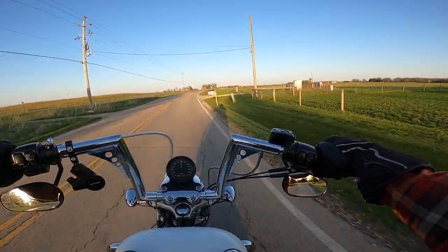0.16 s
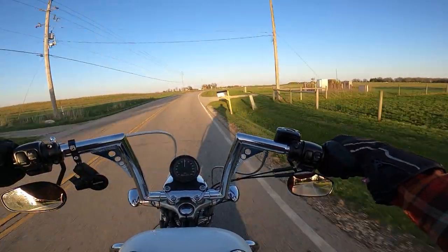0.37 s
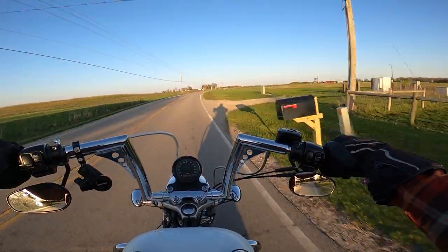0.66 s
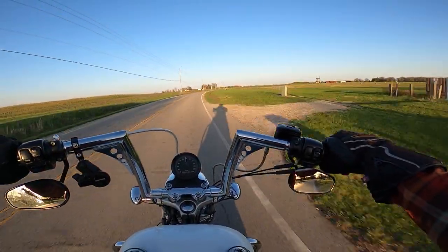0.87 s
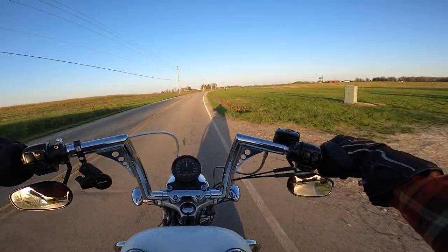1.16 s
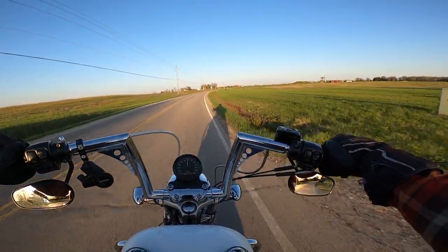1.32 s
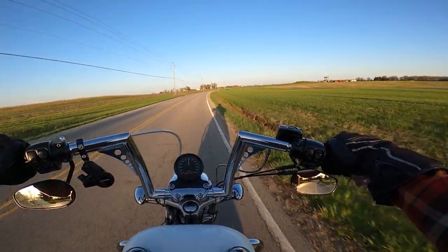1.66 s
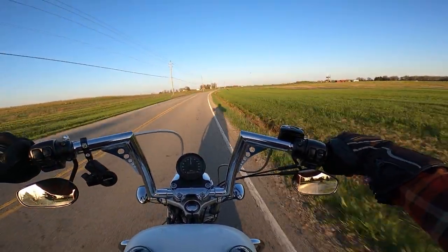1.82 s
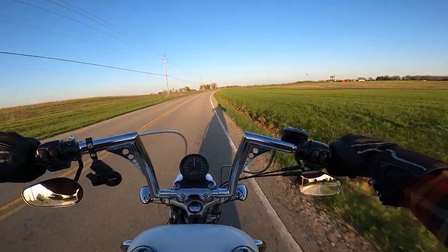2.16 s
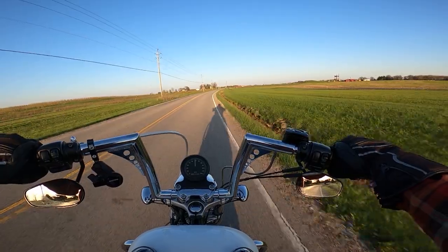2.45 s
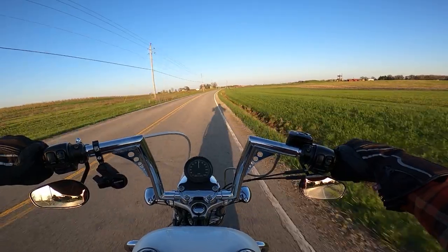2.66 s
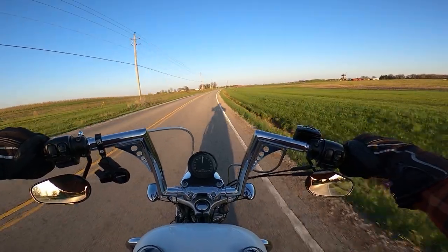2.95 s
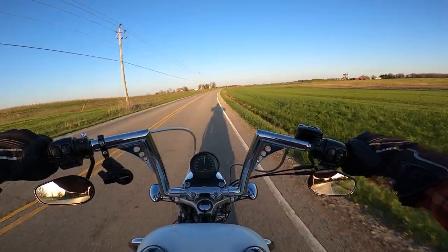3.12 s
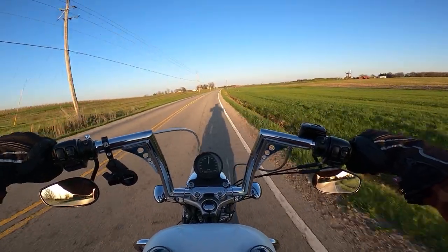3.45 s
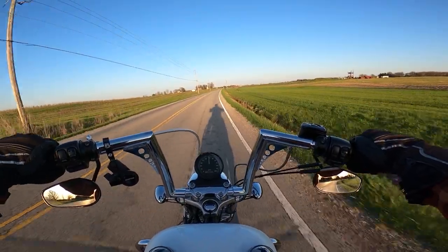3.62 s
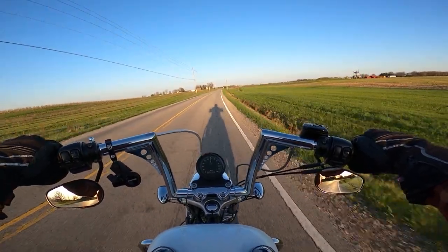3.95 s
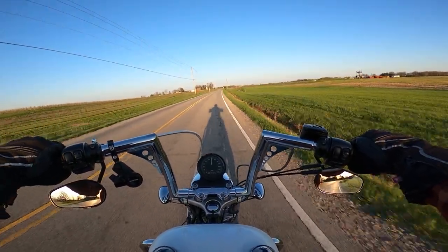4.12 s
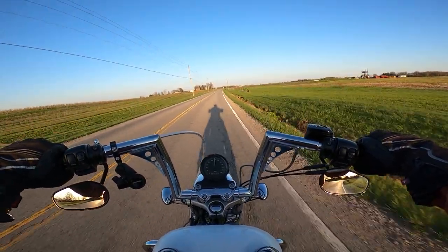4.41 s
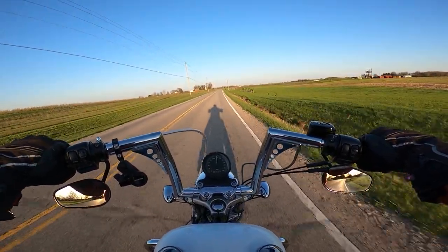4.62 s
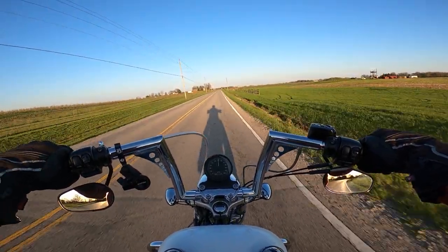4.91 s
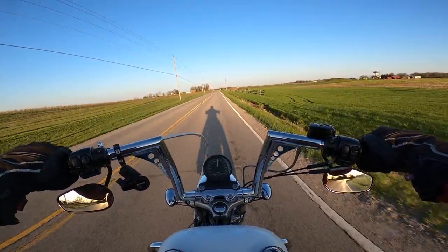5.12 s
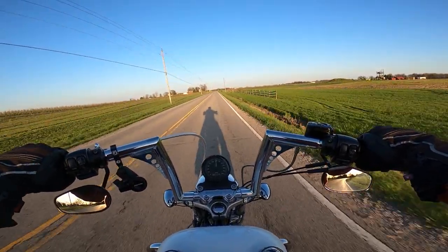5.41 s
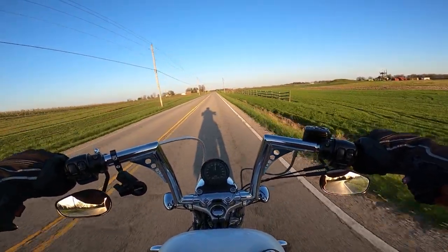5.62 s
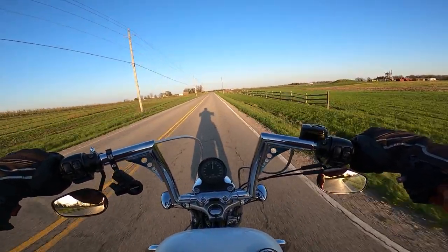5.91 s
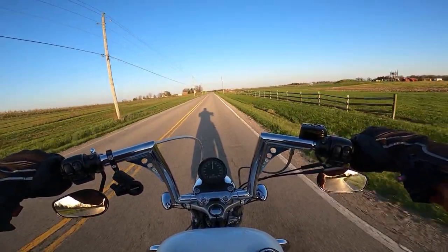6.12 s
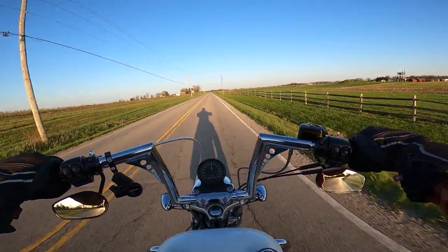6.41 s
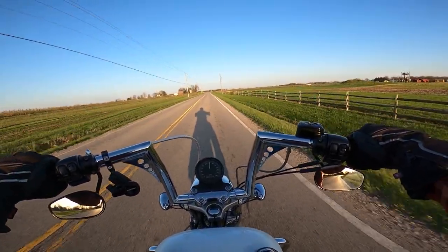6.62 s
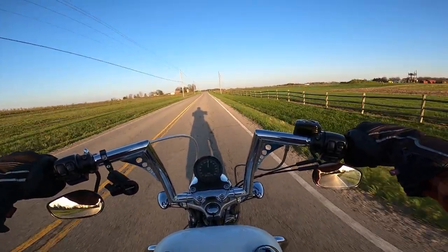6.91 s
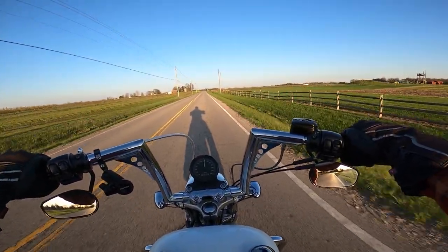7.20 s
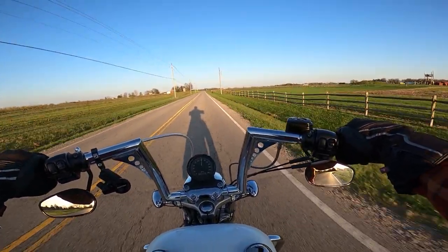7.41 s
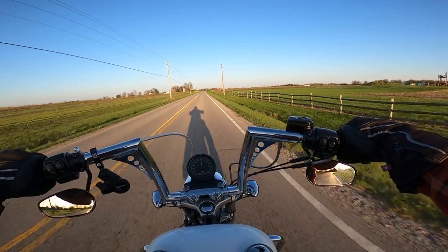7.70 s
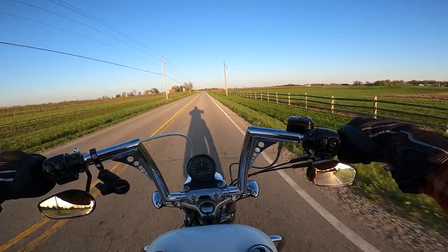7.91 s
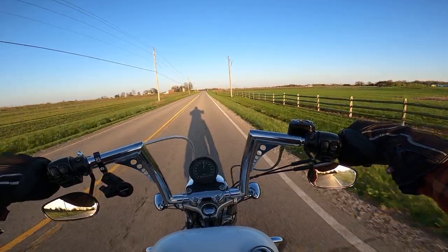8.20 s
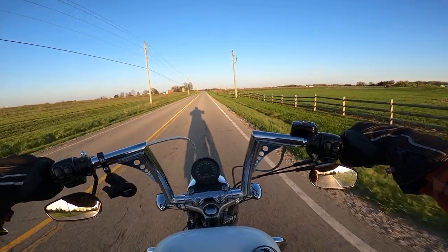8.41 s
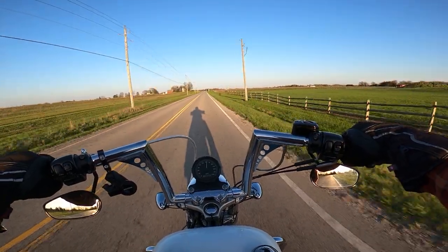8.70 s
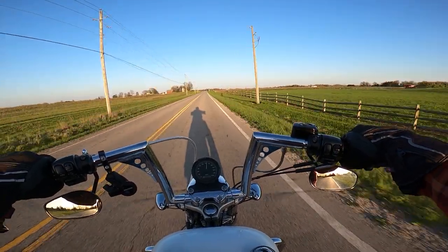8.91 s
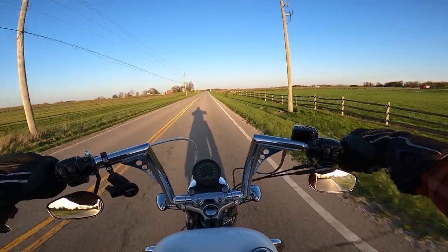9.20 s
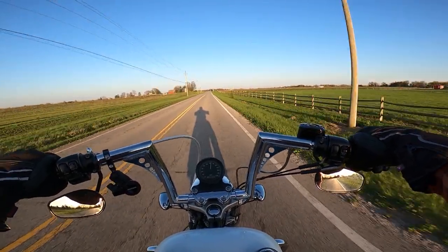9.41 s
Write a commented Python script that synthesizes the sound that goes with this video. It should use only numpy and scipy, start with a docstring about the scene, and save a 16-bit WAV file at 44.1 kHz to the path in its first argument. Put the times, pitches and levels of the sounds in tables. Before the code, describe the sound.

A continuous low motorcycle drone, about twenty-four lumpy engine cycles a second, fills the foreground from start to end. Metallic engine knocks and gritty gas and chain rasp repeat within it. The engine settles, pulls gently for several seconds, then holds. Bassy wind rumbles irregularly against the onboard microphone, and tyre wash stays behind. Tiny airy swishes pass early and near the end. Open road, dry and close, with little treble.

```python
"""On a country road, heard from the seat: an air-cooled V-twin motorcycle cruises, slowly gaining speed.
Two unevenly spaced firings boom through their pipes; knocks of valve gear and pistons ring cases and fins.
One speed curve sets the firing rate, the load and which resonances speak; gas and chain rasp every cycle.
Filtered noise makes the wind, which buffets in slow swells, the wash of the road and brief swishes.
A very faint ticking runs at its own rate, and a soft limiter holds the peaks."""
import sys
import numpy as np
from scipy import signal
from scipy.fft import rfft, irfft
from scipy.io import wavfile
from scipy.ndimage import uniform_filter1d, minimum_filter1d

SR = 44100
rng = np.random.default_rng(int(sys.argv[2]) if len(sys.argv) > 2 else 0)


def bounce(signal):
    """Save signal as a 16-bit WAV file at the path given by the first command-line argument."""
    frames = np.transpose(np.atleast_2d(signal))
    limited = np.clip(frames, -1, 1)
    pcm = np.round(limited * 32767).astype(np.int16)
    wavfile.write(sys.argv[1], SR, pcm)


N = 421155
T = np.arange(N) / SR
CYCLE_DEG = 720  # four-stroke: two turns of the crank


def amp(db):
    """Decibels to gain."""
    return 10 ** (np.asarray(db) / 20)


def unit(x):
    """Scales to rms 1."""
    return x / np.sqrt(np.mean(x ** 2) + 1e-20)


def curve(rows):
    """Joins (t/s, value) rows by straight lines."""
    return np.interp(T, *np.transpose(rows))


def colour(x, points):
    """Minimum-phase filter through (f/Hz, level/dB) points: it rings after a blow, never before."""
    size = 16384
    hz, db = np.transpose(points)
    bins_hz = np.fft.rfftfreq(size, 1 / SR)
    log_gain = np.log(amp(np.interp(np.log(bins_hz + 1), np.log(hz + 1), db)))
    # folding the cepstrum onto positive time makes the response causal
    cepstrum = irfft(log_gain)
    cepstrum[1:size // 2] *= 2
    cepstrum[size // 2 + 1:] = 0
    response = irfft(np.exp(rfft(cepstrum)))[:size // 2]
    return signal.oaconvolve(x, response)[:N]


def noise(points):
    """Noise of rms 1 with the given spectrum."""
    return unit(colour(rng.standard_normal(N), points))


def drift(rate_hz):
    """Slow random movement of rms 1, up to about the given rate."""
    lowpass = 1 / (1 + (np.fft.rfftfreq(N, 1 / SR) / rate_hz) ** 4)
    return unit(irfft(rfft(rng.standard_normal(N)) * lowpass, N))


def blows(crank, degrees, scatter_db, jitter_degrees):
    """One impulse each time the crank passes an angle, never quite alike in size or timing."""
    cycles = np.arange(int(crank[-1] / CYCLE_DEG) + 1)
    size, slip = rng.standard_normal((2, len(cycles)))
    angle = CYCLE_DEG * cycles + degrees + jitter_degrees * slip
    at = np.interp(angle, crank, np.arange(N), left=N, right=N)
    force = amp(scatter_db * size)
    # each impulse is shared between the two nearest samples
    whole, part = at.astype(int), at % 1
    early = np.bincount(whole, force * (1 - part), N + 2)
    late = np.bincount(whole + 1, force * part, N + 2)
    return (early + late)[:N]


def ring(x, modes, revs):
    """Rings a set of metal modes, each driven more or less as the revs climb."""
    out = np.zeros(N)
    for hz, width, db, revs_db in modes:
        resonance = signal.lfilter(*signal.iirpeak(hz, hz / width, SR), x)
        out += amp(db + revs_db * revs) * resonance
    return unit(out)


def running(rpm, full_pull_rpm_per_s=36, load_lag_s=1, high_span_rpm=95):
    """Speed gives two controls: coasting (0 at full pull, 1 at steady speed) and nearness to top revs."""
    gain_rpm_per_s = uniform_filter1d(np.gradient(rpm) * SR, int(load_lag_s * SR), mode="nearest")
    coasting = np.maximum(1 - gain_rpm_per_s / full_pull_rpm_per_s, 0)
    revs = np.clip(1 - (rpm.max() - rpm) / high_span_rpm, 0, 1)
    return coasting, revs


def exhaust(crank, coasting, revs, level_db=-11.5, gas_db=-37.0):
    """Each cylinder blows down into its own pipe over turbulent gas; load and revs reshape the bark."""
    # exhaust valve openings in the cycle: front angle/deg, rear angle/deg
    firing = (79.4, 482.6)
    # response of the two exhaust pipes: f/Hz, front level/dB, rear level/dB
    pipe_response = [(27.3, -51.5, -80), (52.4, -41.5, -37.5), (73.6, -43, -40.5), (116.5, -20.5, -21.5),
                     (141.75, -17.5, -19.5), (158.8, -24, -31.5), (204.4, -32, -37.5), (236, -39.0, -33.5),
                     (289.6, -39.5, -33), (329.7, -83, -49), (334.9, -46.5, -36), (396.4, -37.5, -95),
                     (434.7, -59.5, -87), (930, -104.5, -106), (10000, -130, -130)]
    # turbulent gas leaving the pipes: f/Hz, level/dB
    gas_colour = [(80, -20), (260, 1.5), (340, 6), (410, 4), (490, -7), (900, -54), (10000, -85)]
    # bark bands: f/Hz, width/Hz, change when coasting/dB, change at high revs/dB
    bark = [(309.4, 70, 2.5, 1), (374.4, 53, 0.5, -10)]

    hz, *pipes = np.transpose(pipe_response)
    thumps = np.zeros(N)
    for degrees, pipe in zip(firing, pipes):
        pulses = blows(crank, degrees, scatter_db=0.83, jitter_degrees=0.79)
        thumps += colour(pulses, np.c_[hz, pipe])
    boom = amp(level_db) * unit(thumps) + amp(gas_db) * noise(gas_colour)

    for centre, width, coasting_db, revs_db in bark:
        edges = (centre - width / 2, centre + width / 2)
        band = signal.butter(2, edges, "bandpass", fs=SR, output="sos")
        change = amp(coasting_db * coasting + revs_db * revs) - 1
        boom = boom + change * signal.sosfiltfilt(band, boom)
    return boom


def clatter(crank, revs, cases_db=-39, fins_db=-52.5, case_rub_db=-35, fin_rub_db=-28):
    """The same knocks return every cycle and ring the cases and the fins, over the rub of moving parts."""
    # knocks of valve gear and pistons: angle/deg, level on cases/dB, level on fins/dB
    knocks = [(17.9, 0, -6), (44, -2.2, -8), (89, -5.4, -8), (106.8, -.6, -8), (141.7, -6.3, -9),
              (162.3, -4.1, -8), (215, -30, 0), (240.2, -4.5, -9), (368, -30, -2), (412.7, -10.3, -5),
              (443.4, -3.6, -10), (523.3, -8.9, -2), (554.1, -1, -5)]
    # modes of the engine cases: f/Hz, width/Hz, level/dB, change at high revs/dB
    case_modes = [(503, 67, -2.5, 3), (731, 38, 2, 0), (844, 22, -3, 5), (890, 18, 5, 4),
                  (1085.6, 34, 3.5, -6.5), (1293, 79, -4, -3.5), (1473, 23, -11.5, -2.5)]
    # modes of the cooling fins and covers: f/Hz, width/Hz, level/dB, change at high revs/dB
    fin_modes = [(2265, 110, -0.5, 6), (2480, 140, -5, -1.5), (2670, 90, 3, -5), (3030, 420, -8, 0),
                 (3850, 94, -1, 8.5)]

    on_cases = amp(case_rub_db) * rng.standard_normal(N)
    on_fins = amp(fin_rub_db) * rng.standard_normal(N)
    for degrees, case_db, fin_db in knocks:
        on_cases += amp(case_db) * blows(crank, degrees, scatter_db=1.8, jitter_degrees=0.45)
        # light parts rattle less evenly
        on_fins += amp(fin_db) * blows(crank, degrees, scatter_db=5.5, jitter_degrees=0.89)
    # oil cushions the blows, which takes off their top
    on_cases = colour(on_cases, [(200, -9.5), (500, -2.5), (1550, -5), (2000, -17.5), (8000, -38.5)])
    on_fins = colour(on_fins, [(800, -22.5), (2000, 3), (3800, -2.5), (7000, -17), (10500, -44)])
    return amp(cases_db) * ring(on_cases, case_modes, revs) + amp(fins_db) * ring(on_fins, fin_modes, revs)


def rasp(crank, level_db=-45):
    """Rushes of gas and chain rasp: noise let through at fixed angles of the cycle."""
    # bell-shaped openings: angle/deg, width (standard deviation)/deg, level/dB
    rushes = [(131, 22, -5), (445, 8.4, -2), (512, 18, 1.5), (610, 54, -4.5)]
    # colour of the rushes: f/Hz, level/dB
    rasp_colour = [(300, -22), (700, -6.5), (1000, -1.5), (1300, -1.5), (1750, -21), (2550, -14.5),
                   (3400, -21.5), (5000, -25.5), (8500, -34.5), (10000, -48.5), (15000, -68)]

    gate = np.zeros(N)
    for degrees, width, db in rushes:
        away = (crank - degrees + CYCLE_DEG / 2) % CYCLE_DEG - CYCLE_DEG / 2
        gate += amp(db) * np.exp(-0.5 * (away / width) ** 2)
    return amp(level_db) * unit(gate * noise(rasp_colour))


def wind(level_db=-21.5, lumps_db=2):
    """Lumpy turbulence at the microphone swells and sinks in a slow cycle, easing off along the road."""
    # wind on the microphone: f/Hz, level/dB
    wind_colour = [(8, -22), (30, -3), (60, 0), (120, -5), (200, -13), (300, -20), (400, -25), (500, -31),
                   (1000, -45), (3000, -75), (10000, -95)]
    first_swell_s, period_s, swing_db, fall_db_per_s = 0.53, 2.98, 1.4, 0.26

    swell_db = swing_db * np.cos(2 * np.pi * (T - first_swell_s) / period_s) - fall_db_per_s * T
    turbulence = unit(noise(wind_colour) * amp(lumps_db * drift(rate_hz=30)))
    return amp(level_db + swell_db) * turbulence


def road(level_db=-39, flutter_db=0.67):
    """A fluttering noise wash of tyres, air and running gear, with brief swishes from the roadside."""
    # steady wash: f/Hz, level/dB
    wash_colour = [(200, -14.5), (450, -0.5), (600, -2.5), (720, -2), (900, 0), (1100, -3), (1450, -6.5),
                   (1850, -12.5), (2580, -7), (2950, -13), (4500, -21), (8500, -34.5), (9900, -47.5),
                   (12400, -44.5), (15000, -66)]
    # bell-shaped swishes: t/s, half length (standard deviation)/s, level/dB
    swishes = [(.96, 0.027, -55), (2.86, .018, -55), (9.433, 0.029, -53)]
    # colour of a swish: f/Hz, level/dB
    swish_colour = [(1000, -20), (3500, -3), (7000, -6), (9000, -34.5), (14000, -26.5)]

    wash = amp(level_db) * noise(wash_colour) * amp(flutter_db * drift(rate_hz=43))
    passing = np.zeros(N)
    for s, half, db in swishes:
        passing += amp(db) * np.exp(-0.5 * ((T - s) / half) ** 2)
    return wash + passing * noise(swish_colour)


def ticks(level_db=-70, early_db=-74, step_s=2.5, uneven_db=4):
    """Thin, uneven clicks, 24 a second whatever the engine does; their level steps up once."""
    clicks = np.diff(np.floor(24 * T + 0.42), prepend=0)
    sizes = amp(uneven_db * np.minimum(drift(rate_hz=8), 1.5))
    thin = colour(clicks * sizes, [(2000, -5), (8000, -2), (12500, -1.5), (16000, -4)])
    return amp(np.where(T < step_s, early_db, level_db)) * unit(thin)


def scene():
    """The crank angle drives every part of the engine; wind, road and ticks run beside it."""
    # crankshaft speed, a long gentle pull between two stretches of coasting: t/s, speed/rpm
    speed = [(0.0, 2890.3), (0.65, 2876.9), (2.16, 2886.0), (4.3, 2939.5), (8.58, 3076.6), (9.55, 3071.0)]
    rpm = curve(speed)
    crank = np.cumsum(rpm) * 360 / 60 / SR  # degrees turned
    coasting, revs = running(rpm)
    engine = exhaust(crank, coasting, revs) + clatter(crank, revs) + rasp(crank)
    return (engine + wind() + road() + ticks())[None]


def record(dry, ceiling_db=-5.5, firmness=0.62, edge_hz=15600):
    """A quick, soft limiter rounds off the peaks between a rumble cut and a steep treble cut."""
    dry = signal.sosfilt(signal.butter(1, 6, "high", fs=SR, output="sos"), dry)
    allowed = np.minimum(1, amp(ceiling_db) / (abs(dry) + 1e-9)) ** firmness
    # hold the lowest gain around each peak, then smooth it twice (sizes in samples)
    held = minimum_filter1d(allowed, size=500)
    gain = uniform_filter1d(uniform_filter1d(held, size=250), size=250)
    treble_cut = signal.ellip(10, 0.1, 80, edge_hz, fs=SR, output="sos")
    return signal.sosfilt(treble_cut, dry * gain)


dry = scene()
out = record(dry)
bounce(out)
```